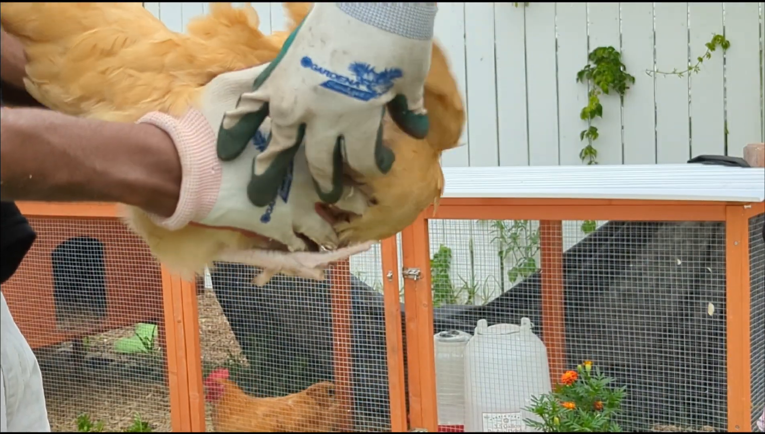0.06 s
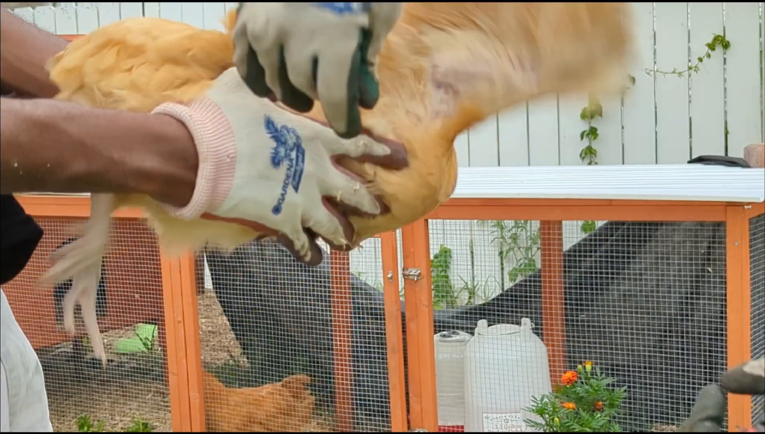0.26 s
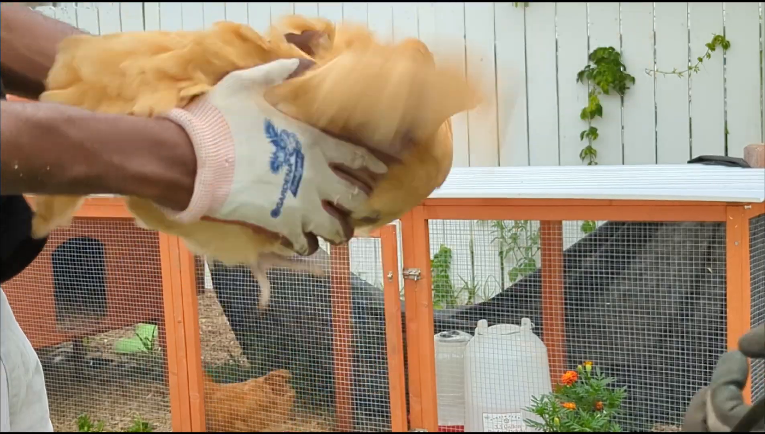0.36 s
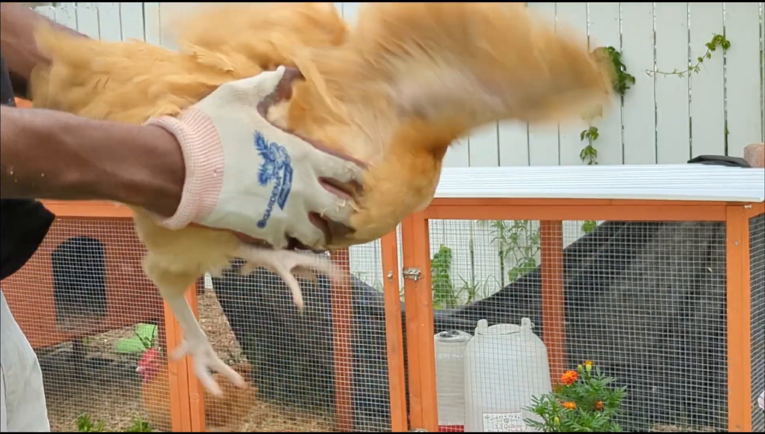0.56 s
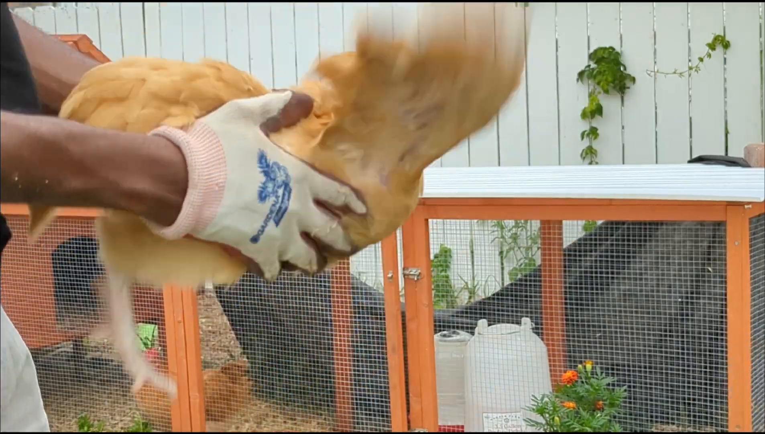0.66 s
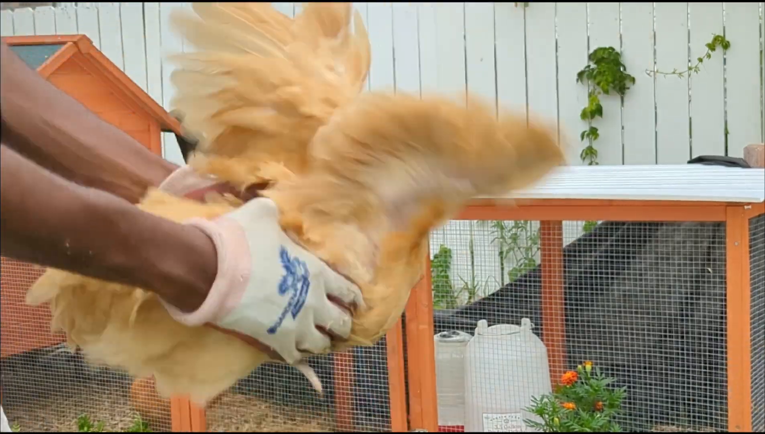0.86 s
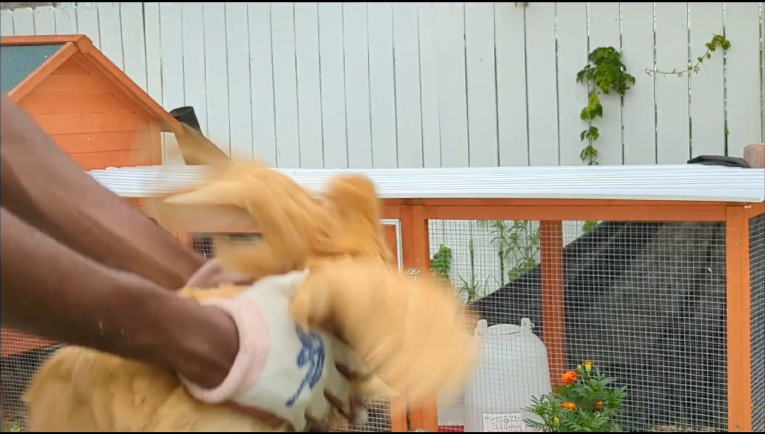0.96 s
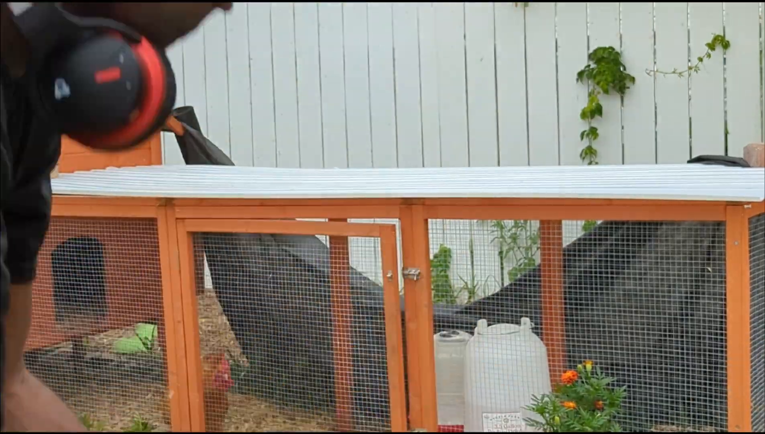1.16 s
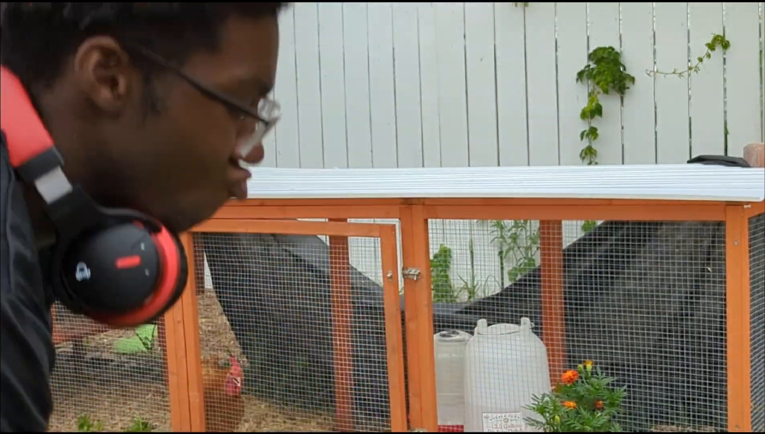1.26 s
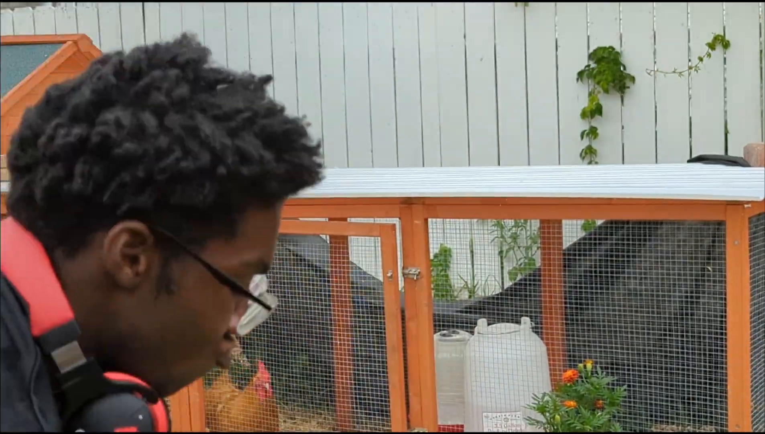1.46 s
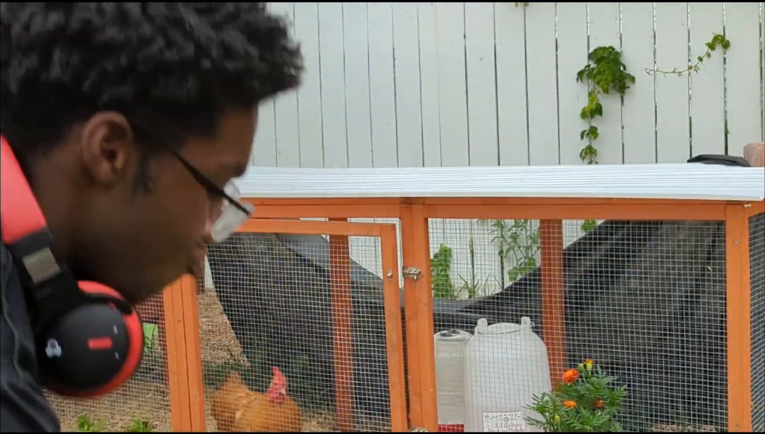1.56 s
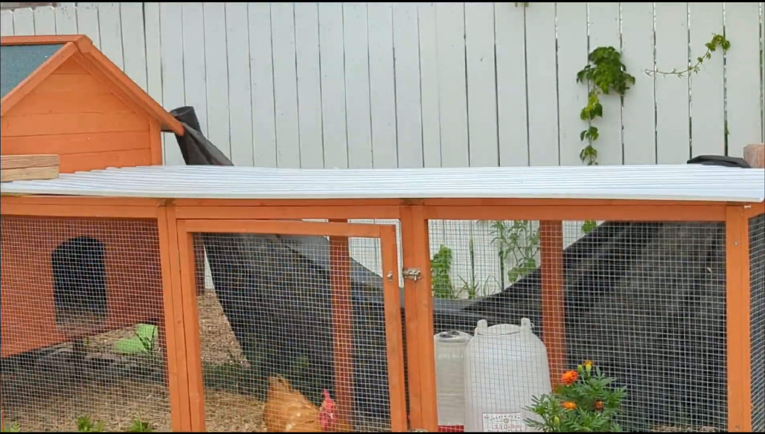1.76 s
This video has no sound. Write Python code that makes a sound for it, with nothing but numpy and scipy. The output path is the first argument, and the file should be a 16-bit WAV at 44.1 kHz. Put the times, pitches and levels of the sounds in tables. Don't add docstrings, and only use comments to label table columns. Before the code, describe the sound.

A hen close to the microphone gives short hoarse clucks while her wings puff air and feathers snap and rustle; late on comes one long loud squawk, with faint slap echoes from a yard fence.

```python
import sys
import numpy as np
from scipy import signal
from scipy.fft import rfft, irfft
from scipy.io import wavfile
from scipy.ndimage import uniform_filter1d

SR = 44100
rng = np.random.default_rng(int(sys.argv[2]) if len(sys.argv) > 2 else 0)


def to_wav(sig):
    pcm = np.clip(np.atleast_2d(sig), -1, 1) * 32767
    pcm = np.round(pcm).astype(np.int16)
    wavfile.write(sys.argv[1], SR, pcm.T)


def level_to_linear(level):
    exponent = np.asarray(level, float) / 20
    return 10 ** exponent


N = 79380


def evened(x):
    return x / np.sqrt(np.mean(x ** 2) + 1e-20)


def add(mix, s, sound):
    at = round(s * SR)
    part = mix[max(at, 0):][:len(sound) + min(at, 0)]
    part += sound[max(-at, 0):][:len(part)]


def coloured(x, points):
    hz, db = np.transpose(points)
    f = np.fft.rfftfreq(len(x), 1 / SR)
    gain_db = np.interp(np.log(f + 1), np.log(hz + 1), db)
    return evened(irfft(rfft(x) * level_to_linear(gain_db), len(x)))


def drift(size, hz):
    width = max(int(SR / hz / 2), 1)
    once = uniform_filter1d(rng.standard_normal(size), width)
    return evened(uniform_filter1d(once, width))


def resonate(x, hz, width_hz):
    turn = np.exp(2j * np.pi * np.cumsum(hz * np.ones(len(x))) / SR)
    r = np.exp(-np.pi * width_hz / SR)
    smooth = signal.lfilter([(1 - r) ** 2], [1, -2 * r, r * r], x / turn)
    return 2 * (turn * smooth).real


# (frequency [Hz], level [dB per Hz])
AIR_COLOUR = [(150, -21), (400, 8), (750, 4.5), (1000, -3), (2100, -1), (5000, -10), (7200, -6.5),
              (16000, -12)]
# (time [s], level [dB])
AIR_SWELL = [(0, -58), (.3, -52), (.45, -53), (.6, -52), (.8, -55.5), (1.02, -51), (1.15, -53), (1.5, -48),
             (1.62, -50), (1.7, -53.5), (1.8, -46)]
RUMBLE_DB = -56.5


def air():
    s, db = np.transpose(AIR_SWELL)
    _, _, z = signal.stft(coloured(rng.standard_normal(N), AIR_COLOUR), SR, nperseg=512)
    patches = uniform_filter1d(rng.standard_normal(z.shape), 12, 0)
    patches = evened(uniform_filter1d(patches, 10, 1))
    hush = signal.istft(z * level_to_linear(2.2 * patches), SR, nperseg=512)[1][:N]
    level_db = np.interp(np.arange(N) / SR, s, db) + 0.74 * drift(N, hz=24.3)
    rumble = evened(resonate(rng.standard_normal(N), 53, 180))
    return level_to_linear(level_db) * hush + level_to_linear(RUMBLE_DB) * rumble


# (delay [s], level [dB], smear [ms])
FENCE_SLAPS = [
    (.012, -21, .3),
    (.08, -28, .15),
    (.1, -36, .2),
    (.125, -27, .45),
]
YARD_DB, YARD_T60_S = -24, .3


def yard(x):
    t = np.arange(SR // 2) / SR
    tail = coloured(rng.standard_normal(len(t)), [(200, 47), (1500, 30), (9000, -26.5)])
    taps = level_to_linear(YARD_DB) * tail * level_to_linear(-60 * t / YARD_T60_S)
    taps = taps * np.sqrt(2 * np.log(1000) / YARD_T60_S / SR)
    for s, db, smear_ms in FENCE_SLAPS:
        smear = np.hanning(round(smear_ms * SR / 1000)) / (smear_ms * SR / 2000)
        add(taps, s, level_to_linear(db) * smear)
    return signal.fftconvolve(x, taps)[:N]


# (middle [s], length [s], level [dB], pitch [Hz])
WING_PUFFS = [(0.111, 0.12, -50, 90), (0.246, 0.12, -49, 80.6), (.45, 0.021, -66, 129),
              (0.385, 0.091, -60, 70), (0.502, 0.046, -37, 117), (0.58, 0.047, -39.5, 72.6),
              (0.735, 0.044, -35, 117), (0.862, 0.079, -47.5, 190), (0.899, 0.1, -41, 108),
              (0.961, 0.071, -43, 72), (1.043, 0.077, -50, 68.6), (1.107, 0.042, -33, 132),
              (1.207, 0.11, -40, 102), (1.253, 0.07, -39.5, 126), (1.352, 0.17, -42.5, 116),
              (1.469, 0.03, -35.5, 110), (1.512, 0.04, -37.5, 133.7)]


def wings():
    out, size = np.zeros(N), 8000
    u = (np.arange(size) - size / 2) / SR
    for s, length, db, hz in WING_PUFFS:
        swell = np.exp(-(u / (length / 2)) ** 2)
        lumpy = rng.standard_normal(size) * level_to_linear(3.0 * drift(size, hz=100))
        push = evened(resonate(lumpy, hz, 1.72 * hz))
        push = push + 0.51 * evened(resonate(lumpy, 2.55 * hz, 4.56 * hz))
        add(out, s - size / 2 / SR, level_to_linear(db) * evened(push * swell) * np.sqrt(np.mean(swell ** 2)))
    return out


# (middle [s], length [s], level [dB])
FEATHER_RUSTLES = [(0.242, 0.03, -41), (0.398, 0.046, -37), (0.444, 0.016, -45.5), (0.537, 0.029, -36),
                   (0.688, 0.027, -33), (0.904, 0.071, -44), (0.963, 0.1, -58), (1.025, 0.0093, -43.5),
                   (1.09, 0.033, -67), (1.233, 0.096, -40.5), (1.335, 0.093, -45.5), (1.484, 0.08, -39),
                   (1.638, 0.095, -53)]


def rustles():
    t, swish = np.arange(N) / SR, np.zeros(N)
    for s, length, db in FEATHER_RUSTLES:
        swish += level_to_linear(db) * np.exp(-((t - s) / (length / 2)) ** 2)
    soft = rng.standard_normal(N) * level_to_linear(2 * drift(N, hz=500))
    return swish * coloured(soft, [(800, 6), (5000, -11), (9000, -10.5), (16000, -15)])


# (time [s], peak level [dB], decay t60 [s], dull slap level [dB])
FEATHER_SNAPS = [(0.116, -36.5, 0.02, -67), (0.263, -25.5, 0.064, -26.5), (0.394, -33, 0.064, -50),
                 (0.4987, -38.5, 0.049, -41), (0.5297, -31, 0.033, -53), (0.6311, -42, 0.029, -43),
                 (0.6784, -34, 0.026, -43), (0.6907, -30, 0.03, -40), (0.8658, -32.5, 0.042, -47),
                 (0.9824, -29, 0.029, -35), (0.9895, -29, 0.072, -32.5), (1.0755, -37.5, 0.02, -31),
                 (1.175, -39, 0.1, -42), (1.206, -29.5, 0.065, -27.5), (1.25, -51, 0.05, -17),
                 (1.3408, -25, 0.04, -45), (1.6076, -34, 0.065, -47)]
# (frequency [Hz], level [dB per Hz])
SNAP_TONE = [(500, -24), (2000, -13), (5000, -9), (10000, -2), (16000, -12)]


def snaps():
    u, snap, slap = np.arange(4000) / SR, np.zeros(N), np.zeros(N)
    for s, db, t60, slap_db in FEATHER_SNAPS:
        spike = .7 * np.exp(-abs(u - .003) / .0013)
        decay = .35 * np.minimum(u / .005, 1) * level_to_linear(-60 * u / t60)
        add(snap, s, level_to_linear(db - 3.0) * (spike + decay))
        add(slap, s, level_to_linear(slap_db) * (spike + decay))
    crackle = rng.standard_normal(N) * level_to_linear(3 * drift(N, hz=500))
    thud = coloured(crackle[::-1], [(300, -15), (700, 0), (1800, 0), (4500, -14), (9000, -40)])
    return snap * coloured(crackle, SNAP_TONE) + slap * thud


# (frequency [Hz], width [Hz], level [dB])
THROAT_TONES = [(500, 260, -9), (1000, 380, -8), (1950, 520, -11), (3100, 480, -16), (4050, 450, -21)]
BEAK_WIDTH_HZ, CLUCK_HZ = 410, 503.5
ARCH, SHUT, JITTER = 0.098, 0.46, 0.12
LUMPS_DB, UNEVEN_DB = 1.6, 2.2


def cluck(start, length, effort_db, beak_hz, rough):
    size = 6000
    u = np.minimum(np.arange(size) / SR / length, 1)
    rough = np.clip(rough, 0, 1)
    arch = np.sin(np.pi * u ** 1.2)
    shake = JITTER * (0.26 + rough) * drift(size, hz=328)
    turns = np.cumsum(CLUCK_HZ * (1 - ARCH + ARCH * arch) * (1 + shake)) / SR
    strength = level_to_linear(UNEVEN_DB * rng.standard_normal(size // 40))[np.round(turns).astype(int)]
    folds = -sum(np.cos(2 * np.pi * k * turns) for k in range(1, 10))
    breath = (0.3 + np.exp(-(turns % 1) / 0.27)) * rng.standard_normal(size)
    swell = arch ** .7 * level_to_linear(-11 * (1 - arch) + LUMPS_DB * drift(size, hz=70))
    drive = (1 - rough) * evened(folds) + rough ** 1.6 * evened(breath)
    drive = drive * swell * strength
    mouth = 1 - (1 - SHUT) * (1 - arch) * (1 - 0.78 * u)
    out = resonate(drive, beak_hz * mouth, BEAK_WIDTH_HZ)
    for k, (f, width_hz, db) in enumerate(THROAT_TONES):
        if f <= beak_hz:
            weight = (1.2 - rough) * (.6 + u) * min(1500 / beak_hz, 1) ** 4
        elif f > 2500:
            weight = arch * (2.1 * (1 - rough)) ** (f / 1600)
        else:
            weight = arch * min(beak_hz / 1300, 1) ** 2
        out -= level_to_linear(db) * (-1) ** k * resonate(drive * weight, f * mouth ** .15, width_hz)
    return start, level_to_linear(effort_db) * evened(out) * np.sqrt(length * SR / size)


# (time [s], pitch [Hz], effort [dB], beak opening [0-1])
SQUAWK_COURSE = [
    (1.246, 462.8, -28, 0.14),
    (1.277, 516.3, -24.5, 0.09),
    (1.32, 514.4, -27, 0),
    (1.338, 528, -25, 0.3),
    (1.372, 538.6, -23, 0.49),
    (1.416, 525.2, -25, 0.62),
    (1.48, 532.8, -25, 0.94),
    (1.505, 494, -19.5, 0.99),
    (1.536, 423, -41, 0.66),
]
# (narrow [dB], after the catch [dB], half open [dB], wide [dB], widest [dB])
BEAK_PARTIALS = [(-27, -22, -12, -7, -12), (-4.5, -0.5, -4.5, -3, -9), (-8, -6, -1.5, -1, 0.5),
                 (-2.5, -12, -8, -5.5, -2), (-17, -25.5, -11, -27, -22), (-0.5, -20.5, 2.5, 2.5, -1),
                 (-14, -9.5, -4.5, -22, -7), (-9, -16, -18, -12.5, -15), (-28, -7.5, -17, -16, -18),
                 (-19, -20, -27, -30, -19), (-19.5, -10.5, -13.5, -15, -18.5), (-24, -15, -17, -22, -32),
                 (-14.5, -27, -22, -11, -25), (-15, -21, -20, -22, -17.5), (-35, -38, -30, -21.5, -21),
                 (-35, -29, -30, -23, -25), (-21, -28, -23, -31, -27), (-26.5, -26, -15.5, -17, -24),
                 (-28, -23, -28, -23, -9.5), (-34, -27, -45, -22, -24), (-41, -27, -30, -32, -38),
                 (-39, -29, -30, -26, -24), (-43, -31, -38, -29, -31), (-40, -34, -42, -36, -36)]
TOP_DB = -38
CATCH_S, CATCH_WIDTH_S = 1.325, .004
WAVER_DB, BREATHY_DB, RASP_DB = 3.2, -31, -28
CRACK_S, CLOSE_S = .042, .052


def squawk():
    s, hz, db, beak = np.transpose(SQUAWK_COURSE)
    t = np.arange(s[0], s[-1], 1 / SR)
    size = 14000
    cracked = np.clip(1 - 2 * (t - s[0]) / CRACK_S, 0, 1)
    closing = np.clip(1 - (s[-1] - t) / CLOSE_S, 0, 1)
    catch = np.exp(-((t - CATCH_S) / CATCH_WIDTH_S) ** 2)
    shake = .0015 + .1 * cracked + .06 * closing ** 2 + .04 * catch
    pitch = np.interp(t, s, hz) * (1 + shake * drift(size, hz=247)[:len(t)])
    turns = np.cumsum(pitch) / SR
    opening, out = np.interp(t, s, beak), np.zeros(len(t))
    for k, row in enumerate(list(BEAK_PARTIALS) + 5 * [5 * [TOP_DB]], start=1):
        level_db = np.interp(opening, [0, .25, .5, .75, 1], row)
        level_db = level_db - np.minimum(7 * k * closing ** 1.2, 11 + k)
        waver = WAVER_DB * min(k / 12, 1.2) ** 1.5 * drift(size, hz=45)[:len(t)] - .8 * k * cracked
        fuzz = 1 + level_to_linear(BREATHY_DB) * (k / 6) ** 1.3 * drift(size, hz=507)[:len(t)]
        out += level_to_linear(level_db + waver) * fuzz * np.cos(2 * np.pi * k * turns + .3 * k * k)
    rasp = rng.standard_normal(size)[:len(t)] * np.exp(-(turns % 1) / 0.68)
    rasp = coloured(rasp, [(3000, -16), (8500, 0), (12500, -5), (15000, -1)])
    out += level_to_linear(RASP_DB + 8 * cracked + 6 * catch + 6 * closing) * rasp
    return s[0], level_to_linear(np.interp(t, s, db)) * out


# (start [s], length [s], effort [dB], beak resonance [Hz], roughness [0-1])
HEN_CLUCKS = [(-0.014, 0.035, -47.5, 846, 0.95), (0.13, 0.026, -45, 714, 0.85),
              (0.145, 0.038, -37, 1320, 0.72), (0.22, 0.042, -32.5, 1296, 0.61),
              (0.256, 0.043, -47, 830, 0.88), (0.332, 0.055, -33.5, 1380, 0.68),
              (0.346, 0.071, -29, 1370, 0.55), (0.41, 0.056, -42.5, 500, 0.67),
              (0.476, 0.11, -26.5, 1388, 0.59), (0.675, 0.044, -39, 1300, 0.77),
              (0.691, 0.029, -34.5, 1030, 0.51), (0.712, 0.041, -51, 1380, 0.78),
              (0.875, 0.078, -33.5, 1260, 0.84), (.908, 0.024, -29, 1320, 1),
              (0.975, 0.023, -42, 650, 1.11), (1.003, 0.015, -48.5, 655, 1.1),
              (1.033, 0.024, -65, 770, 1.1), (1.057, 0.057, -32, 1207, 0.69), (1.17, 0.043, -38, 940, 0.54),
              (1.207, 0.0386, -23, 1610, 0.76), (1.23, 0.029, -25.5, 1434, 0.66),
              (1.251, 0.01, -27.5, 2310, 0.44), (1.258, 0.022, -26, 1620, 0.8),
              (1.412, 0.028, -31.5, 1020, 1.11), (1.428, 0.036, -24.5, 1026, 0.85)]


def hen():
    voice = np.zeros(N)
    for row in HEN_CLUCKS:
        add(voice, *cluck(*row))
    add(voice, *squawk())
    return voice


def scene():
    voice = hen()
    return (air() + yard(voice) + wings() + rustles() + snaps() + voice)[None]


def low_pass(x):
    return signal.sosfilt(signal.butter(12, 16650, fs=SR, output="sos"), x)


def record(dry):
    bass_cut = signal.butter(3, 55, "high", fs=SR, output="sos")
    band_limit = signal.firwin(511, 16050, window=("kaiser", 9), fs=SR)
    mix = signal.sosfilt(bass_cut, dry)
    mix = signal.oaconvolve(mix, band_limit[None], "same")
    return low_pass(mix)


dry = scene()
out = record(dry)
to_wav(out)
```